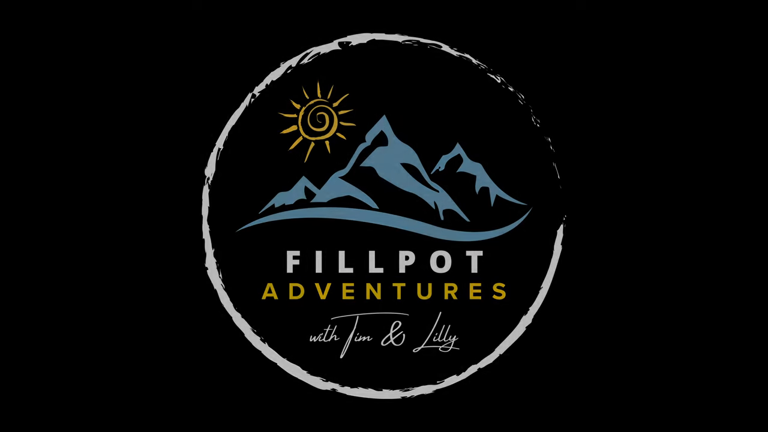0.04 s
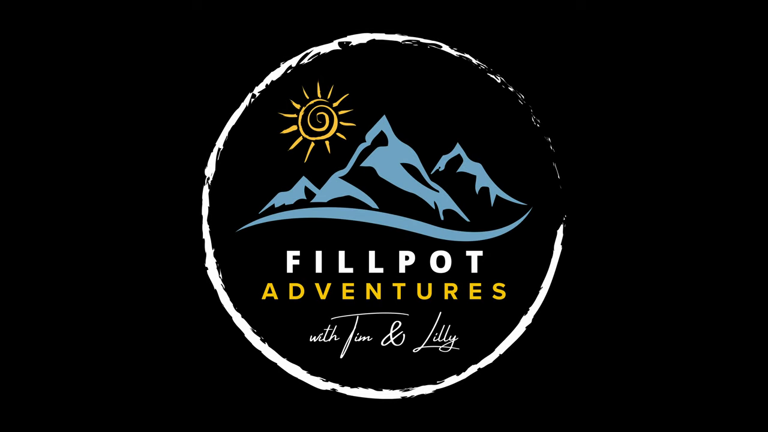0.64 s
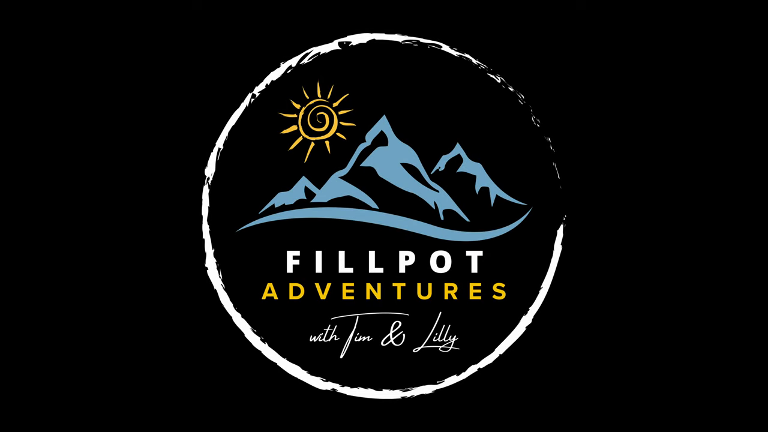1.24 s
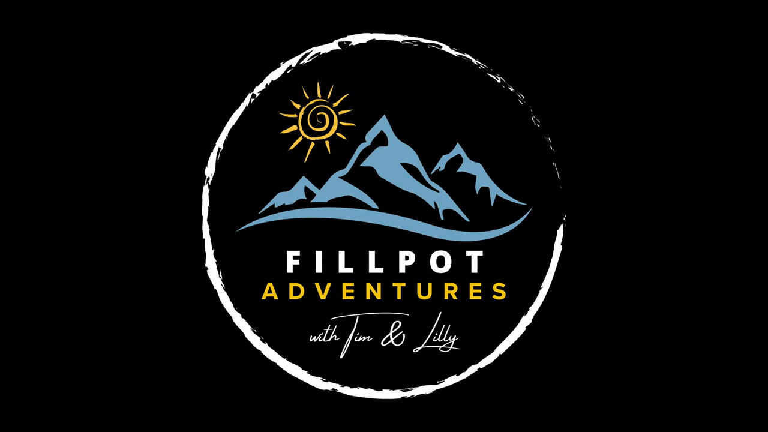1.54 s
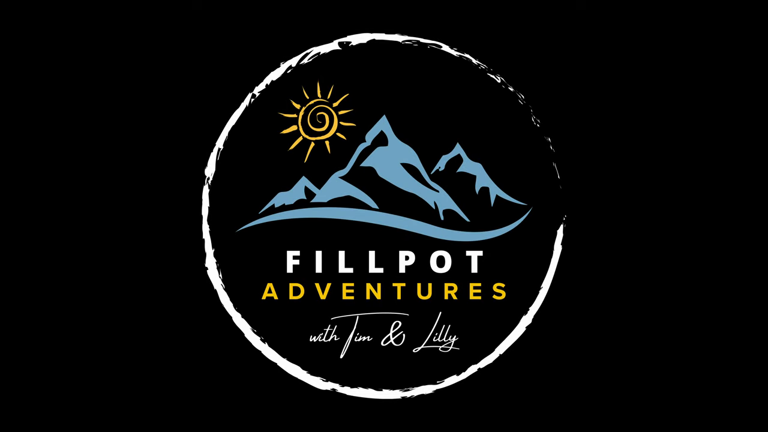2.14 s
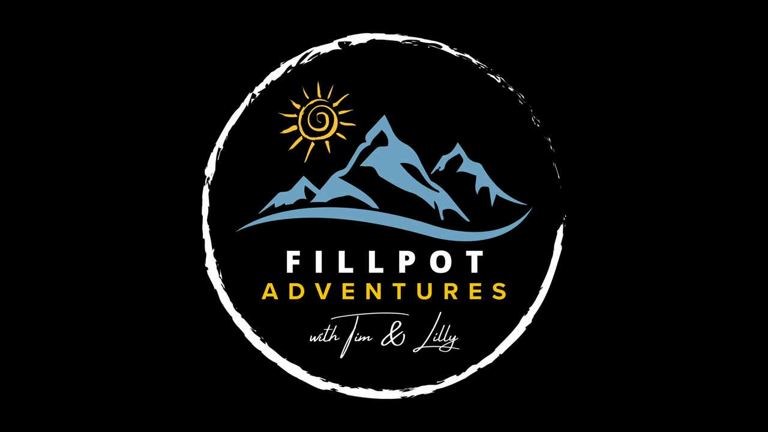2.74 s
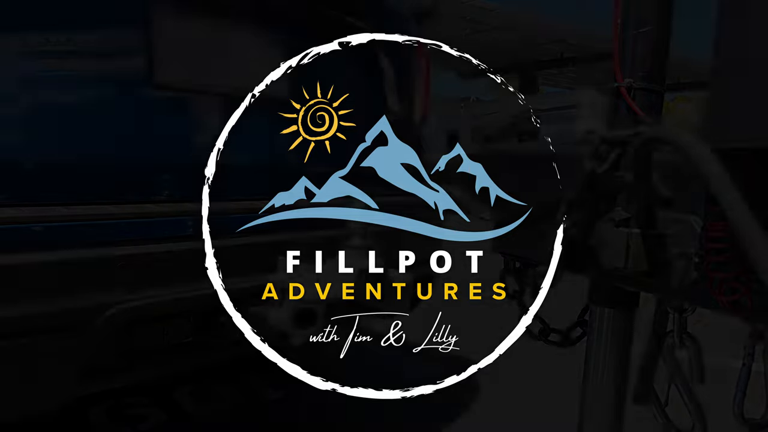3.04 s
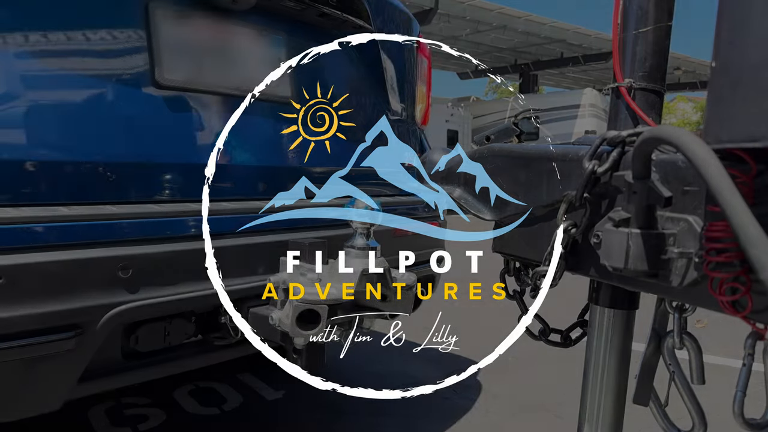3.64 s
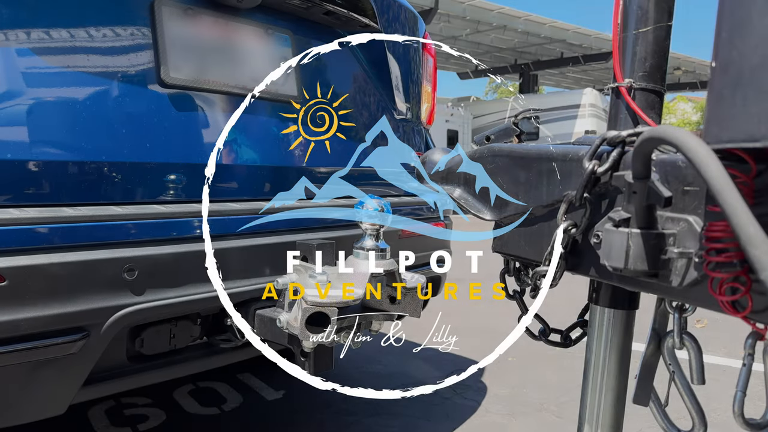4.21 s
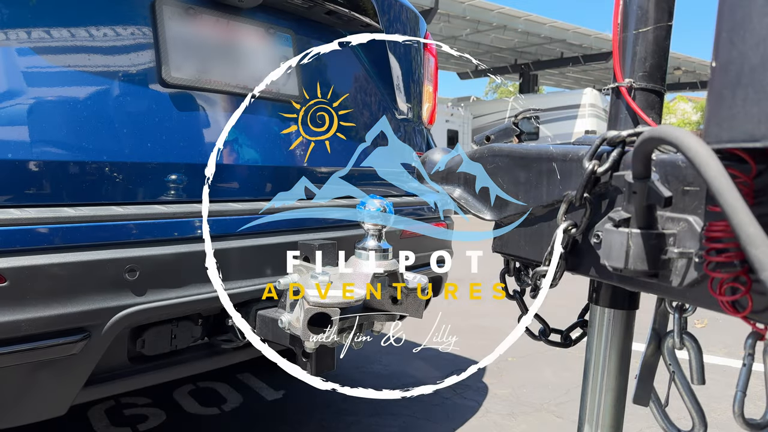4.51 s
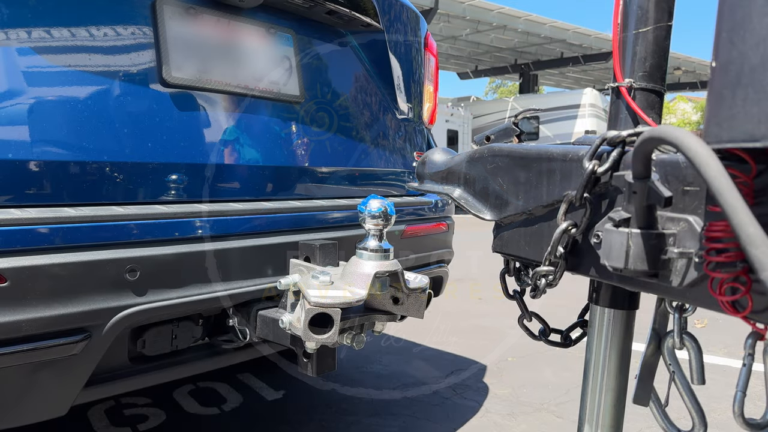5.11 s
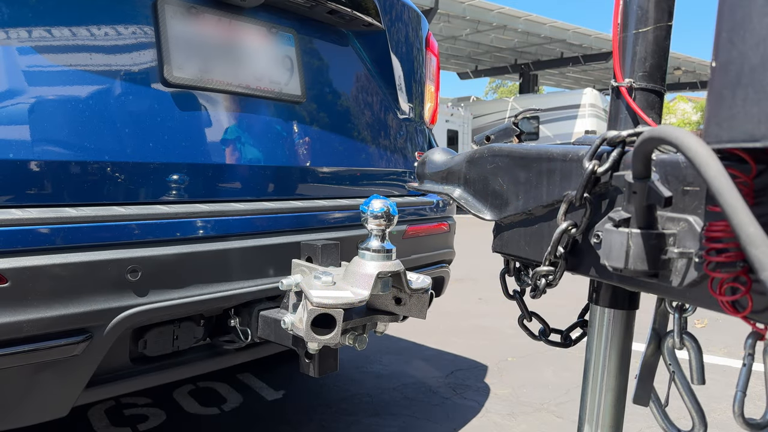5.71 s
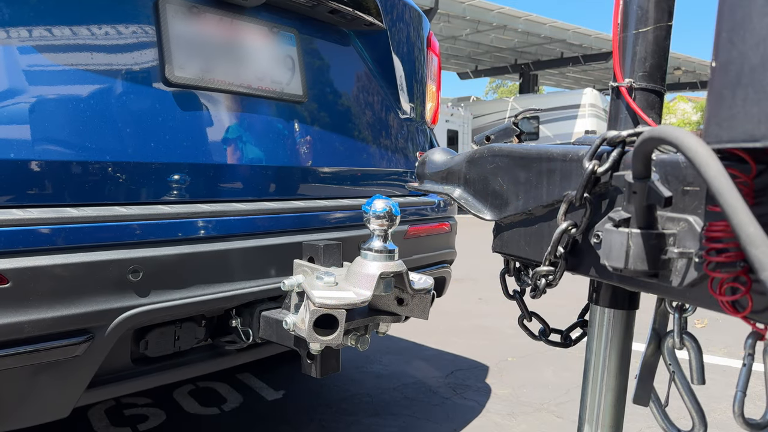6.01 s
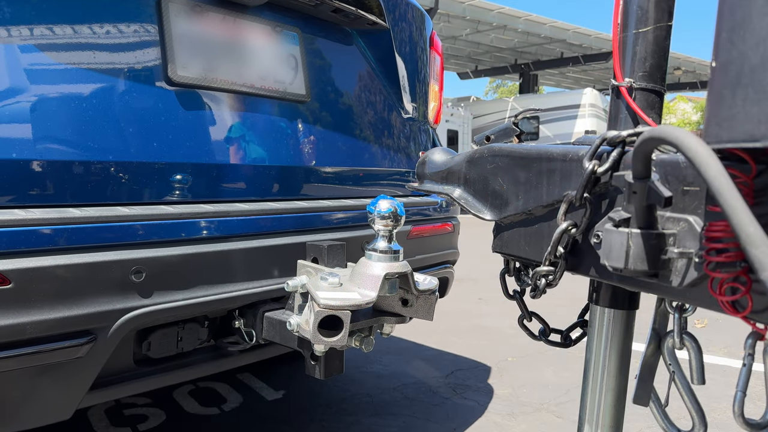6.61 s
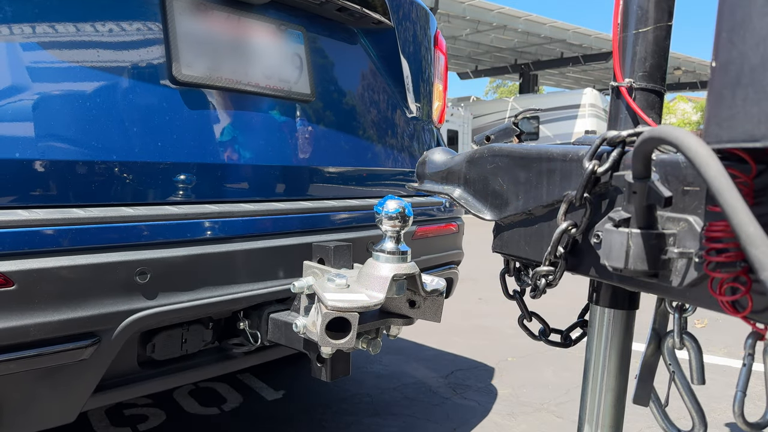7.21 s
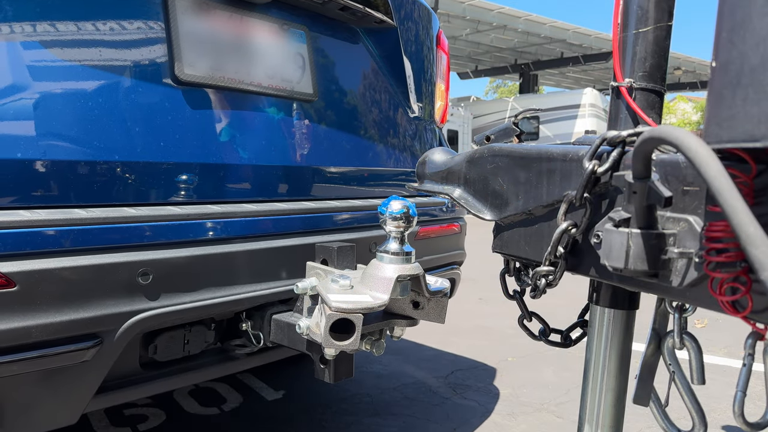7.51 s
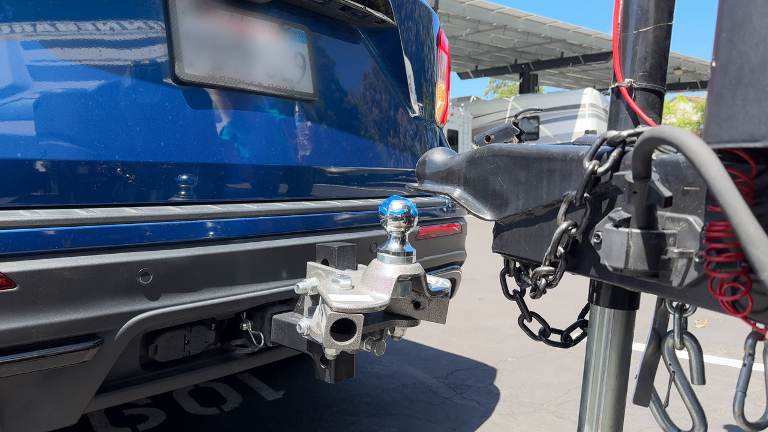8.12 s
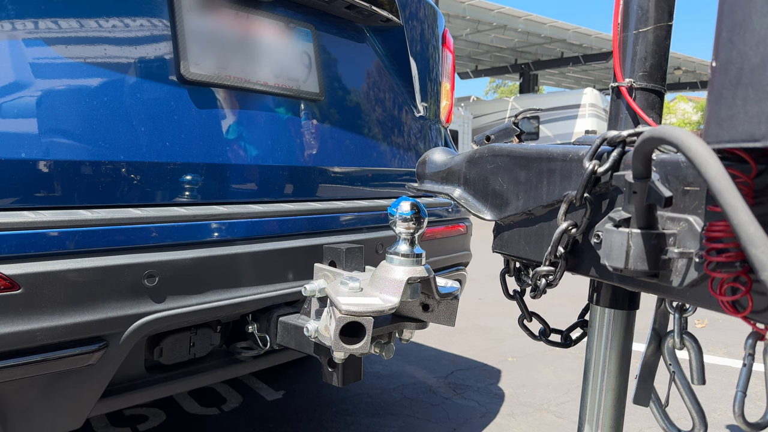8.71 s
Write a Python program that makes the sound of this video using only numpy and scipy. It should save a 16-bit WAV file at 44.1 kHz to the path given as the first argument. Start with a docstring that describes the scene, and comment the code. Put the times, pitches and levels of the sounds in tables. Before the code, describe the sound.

An engine idles steadily outdoors with a low, throbbing exhaust, faint valve clatter, fan noise and a few soft bumps.

```python
"""A throbbing exhaust fades in: a six-cylinder tow vehicle idling outdoors, heard beside its hitch.
Firing tones beat against a low drone. Valves patter on the block; combustion and fuel injection clatter
unevenly. Fan noise, a belt rasp, steady whines and a thin hiss run throughout.
Mostly late on come a few soft bumps, tiny metal ticks and one belt chirp."""
import sys
import numpy as np
from scipy import signal
from scipy.fft import rfft, irfft, next_fast_len
from scipy.io import wavfile

SR = 44100
rng = np.random.default_rng(int(sys.argv[2]) if len(sys.argv) > 2 else 0)


def dump_mix(stems):
    """Bounce the given channels to the path in sys.argv[1] as a 16-bit WAV at rate SR."""
    frames = np.atleast_2d(stems).T  # one column per channel
    limited = np.clip(frames, -1, 1)  # hard clip at full scale
    pcm = np.round(limited * 32767).astype(np.int16)
    wavfile.write(sys.argv[1], SR, pcm)


N = 394694
T = np.arange(N) / SR
HZ = np.maximum(np.fft.rfftfreq(N, 1 / SR), 1)


def undb(db):
    """Decibels to gain."""
    return 10 ** (np.asarray(db) / 20)


def level(x, db):
    """Scale to an rms level."""
    return x * undb(db) / np.sqrt(np.mean(x ** 2))


def curve(rows):
    """Columns of a timed table, per sample."""
    s, *columns = np.transpose(rows)
    return [np.interp(T, s, c) for c in columns]


def spectrum(rows):
    """Columns of a frequency table, per bin."""
    hz, *columns = np.transpose(rows)
    return [np.interp(np.log(HZ), np.log(hz), c) for c in columns]


def resonance(hz, width_hz):
    """One resonance, gain 1 at its centre."""
    return 1 / (1 + 1j * (HZ ** 2 - hz ** 2) / (HZ * width_hz))


def shape(x, response):
    """Filter by a frequency response."""
    return irfft(rfft(x) * response, N)


def white():
    """White noise."""
    return rng.standard_normal(N)


def walk(rate_hz):
    """Smooth random drift, rms 1."""
    size = next_fast_len(N)
    lowpass = np.exp(-(np.fft.rfftfreq(size, 1 / SR) / rate_hz) ** 2)
    return level(irfft(rfft(rng.standard_normal(size)) * lowpass, size)[:N], 0)


def pan(x, left_db):
    """Stereo pair with the left left_db above the right."""
    return x * undb(np.array([[left_db], [-left_db]]) / 2)


def bursts(cycles, decay_cycles, scatter_db, pattern_db=(0,)):
    """One noise burst per cycle, its strength set by a repeating pattern and by chance."""
    index = np.floor(cycles).astype(int)
    age = (cycles % 1) / decay_cycles
    strength_db = np.take(pattern_db, index, mode="wrap") + scatter_db * rng.uniform(-1, 1, N)[index]
    return white() * age * np.exp(-age) * undb(strength_db)


def reflections(strength, count=14):
    """Short echoes from tarmac, bumper and trailer ripple the midrange."""
    delays_s = rng.uniform(.001, .016, count)
    echoes = np.zeros(N)
    echoes[(delays_s * SR).astype(int)] = rng.choice([-1, 1], count) / np.sqrt(count)
    return 1 + strength * rfft(echoes) * HZ / (HZ + 900) / (1 + HZ / 9000)


def exhaust(firings, firing_hz):
    """Tailpipe firing tones; a low drone slides in and out of step with them, so the idle throbs."""
    # Multiples of the firing rate; unequal banks and cylinders give the halves and thirds.
    orders = [1, 4 / 3, 1.5, 2, 7 / 3, 3, 3.5, 4, 13 / 3, 5, 7, 9]
    # Level of each order in dB re the firing tone.
    orders_db = [0, -27, -12, -14, -27.5, -15, -30.5, -13.5, -28, -20, -24.5, -28.5]
    firing_db, load_db_per_hz, waver_db_per_order = -33, 0.7, 0.2
    drone_db, drone_above_hz, drone_start_s = -4, 46.875, .0069
    uneven = firings + 0.0063 * walk(rate_hz=7.0)
    tones = 0
    for order, db in zip(orders, orders_db):
        waver_db = waver_db_per_order * (order - 0.5) * walk(rate_hz=2.5)
        tones += undb(db + waver_db) * np.cos(2 * np.pi * order * uneven)
    drone = undb(drone_db) * np.cos(2 * np.pi * (firings + drone_above_hz * (T - drone_start_s)))
    load_db = load_db_per_hz * (firing_hz - firing_hz.mean())
    return np.sqrt(2) * undb(firing_db + load_db) * (tones + drone)


def valves(firings):
    """Two valves seat per firing: a clean tap and a short rattle ring the engine block."""
    # Each row: centre in Hz, width in Hz, gain in dB.
    block_modes = [(230, 97, 0.5), (364.2, 79, 0.5), (403, 27, -8), (533, 33, -6.5)]
    seatings = 2 * firings + 0.311
    tap_count = np.floor(seatings - .1)
    rattle = bursts(seatings, decay_cycles=0.092, scatter_db=1.5)
    taps = np.diff(tap_count, prepend=tap_count[0]) * undb(4.5 * walk(rate_hz=58))
    block = sum(undb(db) * resonance(hz, width_hz) ** 2 for hz, width_hz, db in block_modes)
    return level(shape(level(rattle, 0) + level(taps, -1.2), block), db=-58)


def injection(firings):
    """Each cylinder gives a dull knock and a fuel pump clatter; an injector ticks between firings."""
    # Six unequal cylinders in firing order. Each row: combustion knock, clatter and tick gains in dB.
    cylinders = [(-0.5, -4.5, -15), (1, -1, -3), (3, -3.5, -2.5), (3, -0.5, -1.5), (-1, -3, -3.5),
                 (1.5, -0.5, -5)]
    knock_db, clatter_db, tick_db = np.transpose(cylinders)
    knock = bursts(firings + 0.11, decay_cycles=0.19, scatter_db=2.5, pattern_db=knock_db)
    clatter = bursts(firings + 0.2, decay_cycles=0.26, scatter_db=0.5, pattern_db=clatter_db)
    tick = bursts(firings - 0.56, decay_cycles=0.13, scatter_db=1.5, pattern_db=tick_db)
    head = resonance(1020, width_hz=750) ** 2 * reflections(strength=0.24)
    housing = resonance(4700, width_hz=3200) ** 2 + 1j * undb(4) * resonance(2850, width_hz=1540) ** 2
    housing *= reflections(strength=0.87) / (1 + (HZ / 8500) ** 6)
    nozzle = resonance(5900, width_hz=1770) ** 2 * reflections(strength=1.0)
    return (level(shape(knock, head), db=-67)
            + level(shape(clatter, housing), db=-67.5)
            + level(shape(tick, nozzle), db=-76))


def fan():
    """Broad, slightly wavering air noise; alike in both ears in the bass, wider above."""
    # Each row: frequency in Hz, relative noise density in dB.
    air_spectrum = [(20, -21), (30, -4), (55, 2), (130, -2), (240, -8.5), (400, -11), (500, -18.5),
                    (620, -18), (840, -14.5), (1250, -25.5), (2100, -27.5), (3200, -35), (6300, -44.5),
                    (10000, -42), (11000, -83.5), (13000, -56.5)]
    # Each row: frequency in Hz, side minus mid in dB, left minus right in dB.
    stereo_image = [(63, -30, -1), (200, -10, 2), (385, -8.5, 0), (610, -6.5, 3), (1120, -2, 2.5),
                    (2250, -10.5, -0.5), (3080, -11.5, 1), (9000, -10.5, 0)]
    colour = undb(spectrum(air_spectrum)[0]) * reflections(strength=0.28)
    width, balance = undb(spectrum(stereo_image))
    mid, side = shape(white(), colour), shape(white(), colour * width)
    ears = np.array([shape(mid + side, np.sqrt(balance)), shape(mid - side, 1 / np.sqrt(balance))])
    return level(ears, db=-44.5) * undb(.5 * walk(rate_hz=17))


def belt_rasp(firings):
    """A rasp from the right that swells with each engine cycle and each firing."""
    # Each row: centre in Hz, width in Hz, gain in dB, signed share reaching the left port.
    rasp_modes = [(1429, 240, -3, -0.54), (1559, 76, 4.5, -0.38), (1686, 165, 2.5, -0.06),
                  (1945, 220, -4, 0.37)]
    cycle_db = 1.5 * np.cos(2 * np.pi * (firings / 6 + 0.039))
    firing_db = 1.9 * np.cos(2 * np.pi * (firings + 0.12))
    swell = undb(cycle_db + firing_db + 0.23 * walk(rate_hz=50))
    rasp = 0
    for hz, width_hz, db, left_share in rasp_modes:
        band = shape(white() * swell, undb(db) * resonance(hz, width_hz) ** 2)
        rasp += np.outer([left_share, 1], band)
    return level(rasp, db=-55)


def whines():
    """Tones of fans and pumps; the loudest holds its pitch, the faint ones wander."""
    # Each row: pitch in Hz, rms level in dB, left minus right in dB, rms wander in Hz.
    tones = [(202, -58.5, 4.5, 0.52), (241.2, -58.5, 2.5, 1.5), (477, -67.5, 2, 4), (535, -68.5, 10, 4.03),
             (749.9, -53.5, 7, 0.35), (831, -72, 11, 9), (1119, -73.5, 13, 8), (1162, -75.5, 6, 6.5),
             (1563, -72, 4, 3), (1965, -77, -3, 8)]
    out = 0
    for hz, db, left_db, wander_hz in tones:
        cycles = np.cumsum(hz + wander_hz * walk(rate_hz=11.94)) / SR
        amplitude = np.sqrt(2) * undb(db + .5 * walk(rate_hz=2))
        out += pan(amplitude * np.cos(2 * np.pi * cycles), left_db)
    return out


def hiss():
    """A narrow, high hiss that wanders in pitch, comes and goes, and flutters."""
    # Each row: time in seconds, centre in Hz, level in dB before gain_db.
    track = [(0.0, 9150, -73), (0.07, 9160, -82), (1.11, 9200, -75), (1.86, 9400, -81), (3.74, 9300, -76),
             (4.46, 9150, -80.5), (4.56, 9280, -76.5), (7.58, 9340, -79.5), (8.58, 9420, -77),
             (8.9, 9300, -80)]
    gain_db = 1
    hz, db = curve(track)
    carrier = np.exp(2j * np.pi * np.cumsum(hz) / SR)
    band = np.real(carrier * (walk(rate_hz=250) + 1j * walk(rate_hz=250)))
    flutter = undb(1.6 * walk(rate_hz=38))
    return level(band * flutter, gain_db) * undb(db)


def bumps():
    """Soft bumps: a tone and one overtone swell and die together."""
    # Each row: start in seconds, tone peak in dB, pitch in Hz, swell in seconds, overtone gain in dB.
    events = [(3.036, -49, 399, .011, -8), (5.9432, -25, 111, .006, -4), (6.016, -48, 385, .0089, -8),
              (8.078, -48, 480, .009, -8), (8.379, -31, 88, .0073, -10), (8.4093, -29.5, 66, .011, -12),
              (8.481, -34, 55, .006, -8), (8.544, -27, 108, .0074, -9)]
    out = np.zeros(N)
    for start_s, db, hz, swell_s, overtone_db in events:
        age_s = np.maximum(T - start_s, 0)
        swell = age_s / swell_s * np.exp(1 - age_s / swell_s)
        phase = 2 * np.pi * hz * age_s
        out += undb(db) * swell * (np.sin(phase) + undb(overtone_db) * np.sin(1.8 * phase))
    return out


def metal_ticks(decay_s=0.0014):
    """Tiny noise strikes ring bright metal resonances."""
    # Each row: start in seconds, strike level in dB.
    events = [(6.320, -61), (6.523, -58), (6.847, -52)]
    # Each row: centre in Hz, width in Hz, gain in dB.
    metal_modes = [(5700, 900, 7), (6800, 800, 8), (8900, 1500, -2), (14700, 2200, -3)]
    strikes = sum(undb(db) * (T >= s) * np.exp(-np.abs(T - s) / decay_s) for s, db in events)
    metal = sum(undb(db) * resonance(hz, width_hz) for hz, width_hz, db in metal_modes)
    return shape(white() * strikes, metal)


def belt_chirp(peak_s=7.59, hz=1725, db=-55.5, half_length_s=.011):
    """The belt chirps once, on the right."""
    envelope = undb(db) * np.exp(-((T - peak_s) / half_length_s) ** 2)
    return pan(envelope * np.sin(2 * np.pi * hz * T), left_db=-19)


def ports(x):
    """The two microphone ports are out of step, most of all in the treble."""
    # Each row: frequency in Hz, lead of the left port in radians.
    port_phase = [(80, 0), (220, .35), (350, .15), (600, .65), (750, -.3), (1150, .7), (1900, -.1),
                  (3200, .75), (5500, .25), (6800, .5), (7200, 1.5), (7750, 5.1), (8300, 6.15), (9300, 4.9),
                  (10300, 4), (13000, 5.2)]
    lead_rad, = spectrum(port_phase)
    return shape(x, np.exp(.5j * np.outer([1, -1], lead_rad)))


def scene():
    """The idle hunts a little and times the engine sounds; all but the hiss fades in."""
    # Each row: time in seconds, firing rate in Hz.
    idle_speed = [(0.0, 31.23), (1.08, 31.3), (1.44, 31.77), (1.89, 31.1), (2.25, 31.47), (2.76, 31.31),
                  (3.21, 30.45), (3.53, 31.67), (4.27, 31.1), (5.26, 31.01), (5.62, 31.65), (6.31, 30.81),
                  (6.57, 31.37), (7.72, 31.1), (8.95, 31.26)]
    first_firing_s, fade_from_db, fade_s = .0258, -5, 1.16
    firing_hz, = curve(idle_speed)
    firings = np.cumsum(firing_hz) / SR - firing_hz[0] * first_firing_s
    machinery = fan() + belt_rasp(firings) + whines() + valves(firings) + injection(firings)
    vehicle = exhaust(firings, firing_hz) + machinery + bumps() + metal_ticks() + belt_chirp()
    fade = undb(fade_from_db * np.maximum(1 - T / fade_s, 0) ** 2)
    return ports(fade * vehicle + hiss())


def record(dry):
    """Brief ramps at both ends and a steep cut of the top treble."""
    edge_s, top_hz = .008, 15700
    edges = np.clip(np.minimum(T, T[-1] - T) / edge_s, 0, 1)
    return signal.sosfilt(signal.ellip(8, .2, 70, top_hz, fs=SR, output="sos"), edges * dry)


dry = scene()
out = record(dry)
dump_mix(out)
```